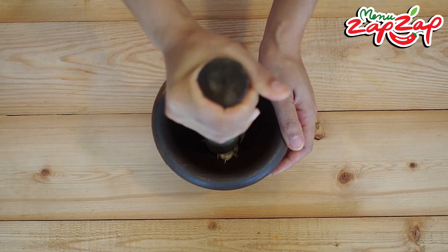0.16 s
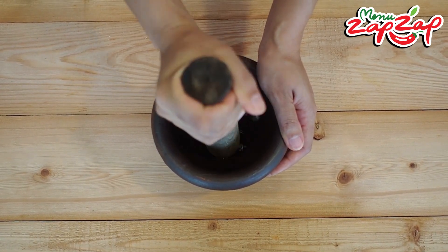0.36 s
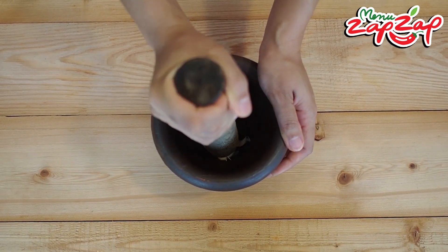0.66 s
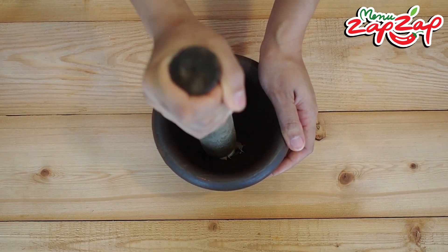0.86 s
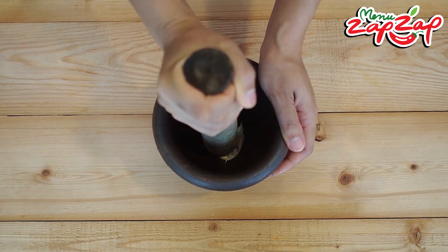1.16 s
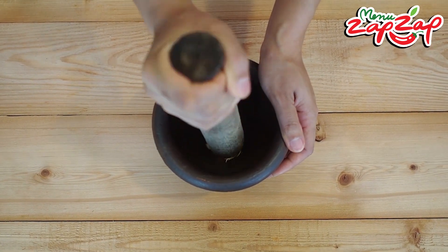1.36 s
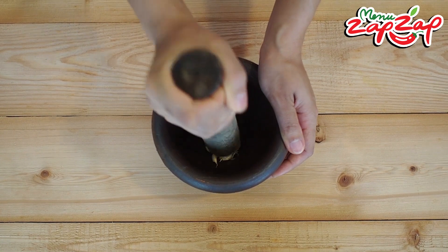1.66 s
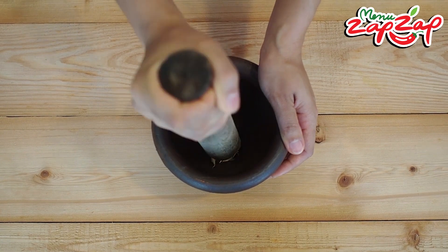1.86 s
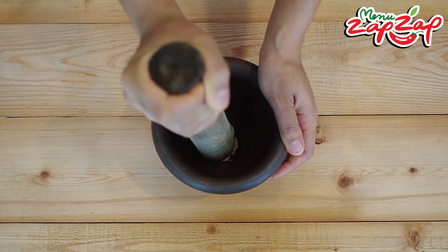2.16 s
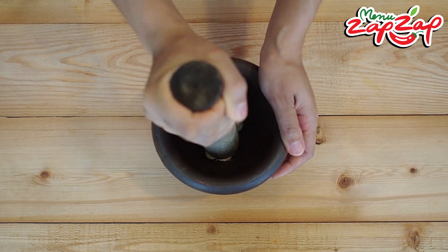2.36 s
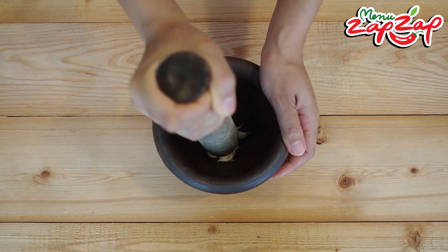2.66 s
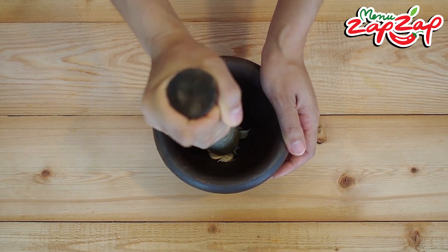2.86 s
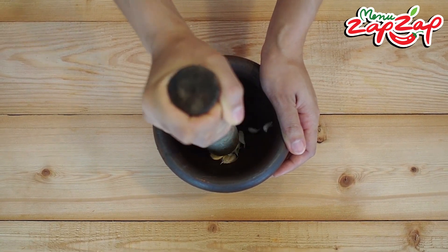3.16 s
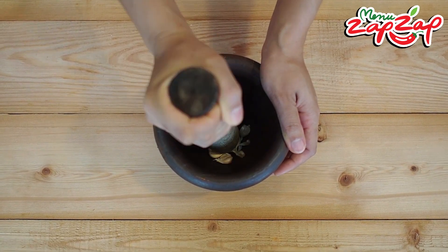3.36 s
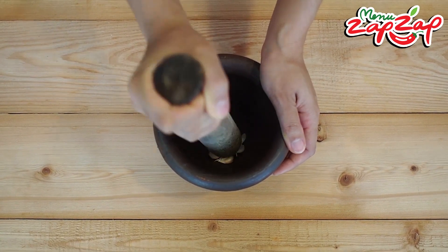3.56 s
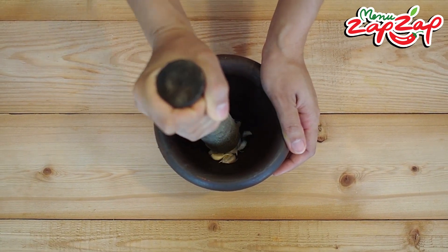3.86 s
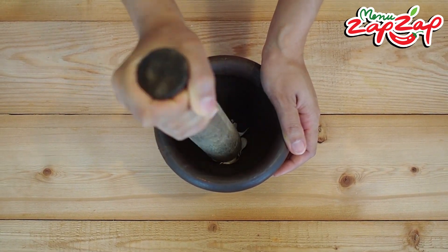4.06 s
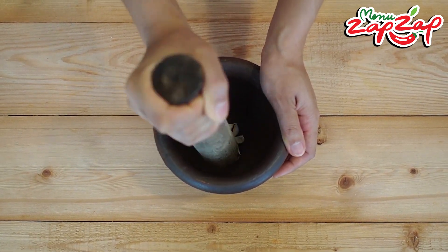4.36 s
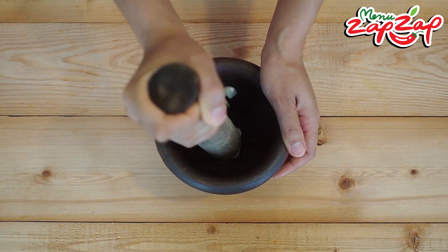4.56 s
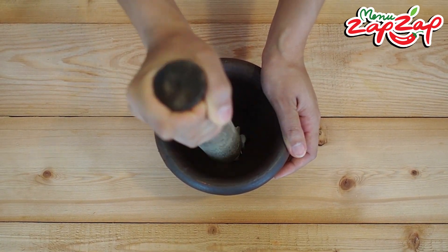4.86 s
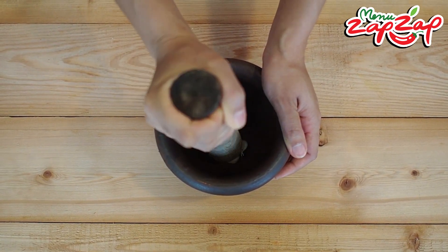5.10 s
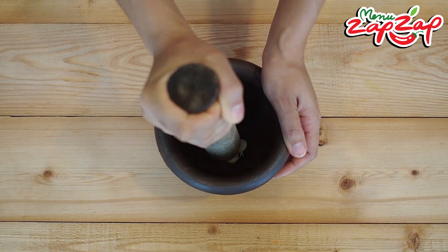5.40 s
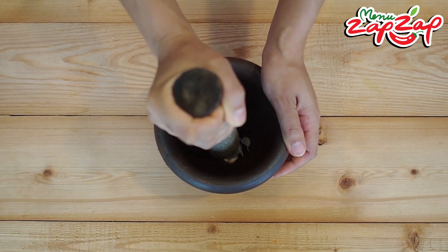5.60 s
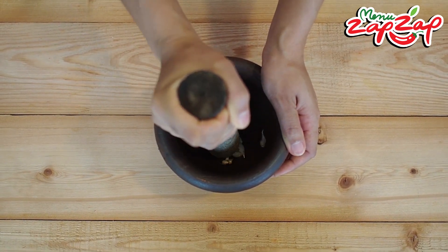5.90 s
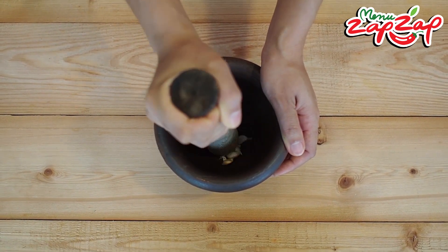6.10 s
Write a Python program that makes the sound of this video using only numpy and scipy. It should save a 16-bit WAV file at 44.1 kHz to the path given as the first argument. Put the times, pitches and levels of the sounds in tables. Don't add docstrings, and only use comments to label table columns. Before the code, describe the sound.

In a reverberant kitchen, a pestle pounds garlic in a mortar on a plank table, miked closely in stereo. The tail of an earlier blow is dying at 0 s; the first new hit lands at 0.13 s, and others follow every 0.27-0.3 s until 6.2 s, twenty-three in all. Each starts with a bright, wet crunch a few milliseconds before a hard, clattering bowl knock, with hollow bowl resonance and a low wooden table thump, then about half a second of room decay. Blows near 1.25, 1.5 and especially 1.77 s are strong, with a thin metallic ring from a nearby utensil. At 0.7 s a sharp sticky snap stands out. Around 3.9-4.5 s the hits soften, the one at 4.5 s mostly a slow squash with a weak knock; firmer pounding resumes at 4.8 s. Skins rustle, pulp ticks and crumbs patter faintly between blows over soft hiss.

```python
import sys
import numpy as np
from scipy import signal
from scipy.fft import rfft, irfft
from scipy.io import wavfile
from scipy.ndimage import uniform_filter1d

SR = 44100
rng = np.random.default_rng(int(sys.argv[2]) if len(sys.argv) > 2 else 0)


def gain_from_db(level_db):
    decades = np.asarray(level_db, float) / 20
    return 10 ** decades


def int16_out(signal):
    q = np.round(np.clip(np.atleast_2d(signal).T, -1, 1) * 32767)
    wavfile.write(sys.argv[1], SR, q.astype(np.int16))


N = 275184
PAD = SR // 4
USUAL_DB = -21

# f/Hz, level/dB per Hz
SQUELCH = [(880, -32), (1500, -13.5), (2450, -17), (3590, -2), (4800, -6), (7250, -0.5), (12200, -6.5),
           (13900, 0), (15900, -9), (16500, -16)]
# f/Hz, level/dB per Hz
SKINS = [(2500, -19), (4500, -6.5), (6500, -8), (8000, 2.5), (10500, -3), (12000, 0), (13500, 2),
         (16000, -6)]


def read(points, hz):
    f, value = np.transpose(points)
    return np.interp(np.log(hz + 1), np.log(f + 1), value)


def evened(x):
    return x / np.sqrt(np.mean(x ** 2) + 1e-20)


def add(mix, s, sound):
    part = mix[PAD + round(s * SR):][:len(sound)]
    part += sound[:len(part)]


def shaped(x, gain):
    size = x.shape[-1]
    return irfft(rfft(x) * gain(np.fft.rfftfreq(size, 1 / SR)), size)


def causal(db, size=2048):
    log_gain = np.log(gain_from_db(np.r_[db, db[-2:0:-1]]))
    return np.fft.ifft(np.exp(np.conj(signal.hilbert(log_gain)))).real[:size]


def mode(t, hz, db, t60, rise_ms):
    swell = 1 - np.exp(-t * 1e3 / rise_ms)
    return gain_from_db(db - 60 * t / t60) * swell * np.sin(2 * np.pi * hz * t)


def pulp_db(hz, spray_db, body):
    return read(body, hz) + spray_db * np.clip((hz - 10500) / 2200, 0, 1)


def fizz(colour, grain_db, size=4096):
    white, clumps = rng.standard_normal((2, size))
    clumps = gain_from_db(grain_db * evened(uniform_filter1d(clumps, size=24)))
    return evened(shaped(white * clumps, lambda hz: gain_from_db(colour(hz))))


def likeness(hz):
    # f/Hz, left-right correlation/1
    same = [(100, 0.89), (640, 0.94), (1400, 0.65), (3100, 0.036), (7000, 0.052), (15000, 0.055)]
    return np.clip(read(same, hz), 0, 1)


def hush():
    # f/Hz, level/dB per Hz
    air = [(30, -3), (130, -4), (400, -16.5), (1500, -27), (6000, -33), (11000, -41.5), (13700, -35),
           (16000, -36)]
    a, b = rng.standard_normal((2, N))
    right = shaped(a, likeness) + shaped(b, lambda hz: np.sqrt(1 - likeness(hz) ** 2))
    return gain_from_db(-48.5) * evened(shaped(np.array([a, right]), lambda hz: gain_from_db(read(air, hz))))


def crumbs():
    size = N + PAD
    ticks = rng.random(size) < 70 / SR
    sizes = gain_from_db(4.5 * np.minimum(rng.exponential(1, size), 4)) * ticks
    decay = np.exp(-np.arange(200) / 34.0)
    burst = np.convolve(sizes, decay)[:size] * rng.standard_normal(size)
    return gain_from_db(-54) * shaped(burst, lambda hz: gain_from_db(pulp_db(hz, 3.2, SKINS)))


def rustle(s, half_ms, db):
    ms = (np.arange(8192) - 4096) / SR * 1e3
    clusters = gain_from_db(5.7 * evened(uniform_filter1d(rng.standard_normal(len(ms)), size=90)))
    swell = np.exp(-(ms / max(half_ms, 2)) ** 2)
    crackle = fizz(lambda hz: pulp_db(hz, 2, SKINS), grain_db=-3.5, size=8192)
    return s - 4096 / SR, gain_from_db(db) * swell * clusters * crackle


def crush(s, rise_ms, length_ms, db, spray_db):
    end_ms = max(length_ms, rise_ms + 0.28)
    ms = np.arange(4096) / SR * 1e3 - 3
    at_ms = [-3, -.4, 0, 0.73 * rise_ms, rise_ms, rise_ms + 1.16, end_ms + 0.43, end_ms + 5, end_ms + 70]
    level_db = np.interp(ms, at_ms, [-50, -64, -9.5, -1.0, 4.0, -1.0, -8.0, -14, -91])
    wet = fizz(lambda hz: pulp_db(hz, spray_db + 4, SQUELCH), grain_db=3.8)
    return s - .003, gain_from_db(db - 2.5 + level_db) * wet * signal.windows.tukey(len(ms), .02)


def snap(s, rise_ms, length_ms, db, spray_db):
    hz = np.fft.rfftfreq(4096, 1 / SR)
    click = causal(pulp_db(hz, 0.79 * (spray_db + 3.5), SQUELCH))
    return s + rise_ms / 1e3, gain_from_db(db + 19.5) * click / np.linalg.norm(click)


def knock(db):
    # f/Hz, width/Hz, level over the clatter/dB
    bowl = [(544, 47, 4), (788, 53, 5.5), (1033, 73, 5), (1264, 20, -2), (1527, 130, 4), (1850, 56, 2.5),
            (2140, 52, 3.5), (2820, 86, 5), (3327, 125, 5.5), (4050, 78, 5.5)]
    # f/Hz, level/dB per Hz
    clatter = [(150, -22.5), (300, -7), (620, -11), (900, -6.5), (1500, -4.5), (2200, -9), (2600, -13.5),
               (4000, -15), (5000, -18.5), (7000, -31.5), (12000, -74)]
    hz = np.fft.rfftfreq(4096, 1 / SR)
    spot = rng.standard_normal(len(bowl))
    bumps = 0
    for (f, width, mode_db), k in zip(bowl, spot):
        bumps = bumps + (mode_db + 1.05 * k) / (1 + (2 * (hz - f) / width) ** 2)
    click = causal(read(clatter, hz) + bumps)
    click /= np.linalg.norm(click)
    ms = np.arange(2600) / SR * 1e3
    contacts = (rng.random((2, len(ms))) < .15) * rng.standard_normal((2, len(ms)))
    contacts = evened(contacts) * gain_from_db(np.interp(ms, [0, 4, 22, 59], [1.5, 1.5, -11.0, -20]))
    shared, apart = signal.fftconvolve(contacts, click[None], axes=1)
    apart = .5 * shaped(apart, lambda f: np.clip(f / 2200, 0, 1))
    return gain_from_db(db + 3.0) * np.array([shared + apart, shared - apart]), gain_from_db(db + 29) * click


def table_levels(db, low_db, high_db, hollow_db):
    low_boards = (-2.5, 4.5)
    high_boards = (2, -4.5)
    legs_db = -29 + 0.28 * (db - USUAL_DB)
    parts = [legs_db, low_db + 0.4, hollow_db]
    planks = [low_db + k for k in low_boards] + [high_db + k for k in high_boards]
    planks[0] += 0.17 * (USUAL_DB - db)
    return np.subtract(parts, db), np.subtract(planks, db)


def shaken(db, parts_db, planks_db):
    # f/Hz, level/dB, t60/s, rise/ms
    rings = [
        [(48.6, -8, 0.39, 7.9), (53.9, 3.5, 0.46, 7.7), (63.2, 5, 0.17, 6.4), (77.4, -1.5, 0.29, 6.6)],
        [(133.3, 4, 0.17, 5.3), (175.6, -10, 0.29, 0.53)],
        [(249.7, -17, 0.35, 1), (297, -5, 0.34, 0.85), (320.6, 9, 0.11, 4.1), (318.5, -10, 0.62, 3.7)],
    ]
    # f/Hz, level/dB, t60/s, rise/ms
    planks = [(113.5, -4, 0.45, 6.7), (140, -6.5, 0.67, 2.6), (167.26, -0.5, 0.31, 2.8),
              (191.7, -5.5, 0.56, 12)]
    # f/Hz, level/dB, t60/s, rise/ms
    wall_modes = [(854, -17.5, 0.48, 7.7), (952, -18.5, 0.72, 32), (1103, -6, 0.15, 3.4),
                  (1240, -5, 0.17, 6.5), (1497, -23, 0.27, 4.5), (1491, -20, 0.64, 1.7),
                  (1788, 2.5, 0.06, 0.44), (2216, -20.5, 0.27, 3.1)]
    grip_detune = .022
    t = np.arange(SR * 3 // 5) / SR
    landed = np.maximum(t - .004, 0)
    boards = sum(gain_from_db(k) * mode(t, *m) for m, k in zip(planks, planks_db))
    wall = 0
    for (hz, *m), k in zip(wall_modes, rng.standard_normal(len(wall_modes))):
        wall = wall + gain_from_db(2.5 * k) * mode(landed, hz * (1 + grip_detune * k), *m)
    rest = 0
    for part, k in zip(rings, parts_db):
        for m in part:
            rest = rest + gain_from_db(k + rng.standard_normal()) * mode(t, *m)
    return -gain_from_db(db + 2.5) * (boards + wall + rest)


def utensil(s, db, ring_db):
    # f/Hz, onset level over the mean/dB, t60/s, rise/ms, right-port share/1
    metal = [(3413, 16, .62, 12, 0), (3375, 15, .5, 8, -.6), (5787, 20, .38, 8, .1), (5851, 18, .6, 14, .4),
             (3235, 7, .45, 8, -.3)]
    # level at a usual ring/dB, slope/dB per dB of ring
    ring_law = [(-45.5, .8), (-44, 1.1)]
    # level at a usual knock/dB, slope/dB per dB of knock
    shrill_law = [(-62, 2.7), (-63.5, 3.0)]
    usual_ring_db = -48
    modes_db = [usual + slope * (ring_db - usual_ring_db) for usual, slope in ring_law]
    modes_db += [usual + slope * (db - USUAL_DB) for usual, slope in shrill_law]
    modes_db.append(modes_db[1])
    t = np.arange(SR * 3 // 5) / SR
    wobble = rng.standard_normal((len(metal), len(t)))
    wobble = uniform_filter1d(uniform_filter1d(wobble, size=500), size=500)
    wobble_db = 2.5 * evened(wobble) - .5
    ringing = 0
    for m, level_db, w in zip(metal, modes_db, wobble_db):
        ringing = ringing + np.outer(gain_from_db(level_db + w) * mode(t, *m[:4]), [1, m[4]])
    return s, ringing


def peel(s, db, length_ms):
    ms = np.arange(4096) / SR * 1e3
    shape = gain_from_db(db - 2.0 - 20 * ms / max(length_ms, 1)) * (1 - np.exp(-ms / 0.27))
    return s, shape * fizz(lambda hz: pulp_db(hz, -1, SKINS), grain_db=7.0)


def kitchen(mixes):
    # f/Hz, t60/s
    decay = [(100, 0.55), (300, 0.47), (750, 0.52), (1900, 0.56), (5000, 0.54), (13500, 0.38)]
    # f/Hz, level of room against direct/dB
    wet = [(200, 5.5), (1000, 3), (2500, 1), (6000, -8.5), (14000, -8.5)]
    taps = np.zeros((len(mixes) + 1, 2, SR * 3 // 5))
    jitter = rng.integers(0, 12, (len(taps), 2, (taps.shape[2] - 131) // 12))
    at = np.arange(130, taps.shape[2] - 12, 12) + jitter
    np.put_along_axis(taps, at, rng.choice([-1., 1.], at.shape), 2)
    hz, t, z = signal.stft(taps[:-1] + 1.6 * taps[-1], SR, nperseg=256)
    same = likeness(hz)[:, None]
    z[:, 1] = same * z[:, 0] + np.sqrt(1 - same ** 2) * z[:, 1]
    t60 = read(decay, hz)[:, None]
    tails = signal.istft(z * gain_from_db(-60 * t / t60) / np.sqrt(t60), SR, nperseg=256)[1]
    tails[..., :130] = 0
    tails = shaped(tails / np.linalg.norm(tails[0, 0]), lambda f: gain_from_db(read(wet, f)))
    return signal.fftconvolve(mixes[:, None], tails, axes=2)[..., :mixes.shape[1]].sum(0)


def scene():
    # t/s, rise/ms, peak level/dB, fine spray above the squelch/dB
    crushes = [(0.1213, 1.3, -9.5, -5.5), (0.418, 0.71, -9, -5.5), (0.6933, 6.5, -11, 3),
               (0.9623, 11.1, -11.5, 0.5), (1.2336, 5.6, -9.5, -4), (1.499, 1.5, -7.5, -6),
               (1.7646, 1.3, -7.5, -12), (2.0458, 3, -8.5, -5.5), (2.3148, 4.8, -9, -7),
               (2.576, 3.2, -11, -5), (2.8523, 3, -11.5, -4), (3.1181, 7.5, -11.5, -2.5),
               (3.397, 0.9, -10, -10), (3.671, 2.37, -9.5, -9), (3.936, 4.2, -12.5, -1),
               (4.208, 14, -14, -2.5), (4.48, 23.7, -15, -1.5), (4.7721, 4.8, -10, -2),
               (5.066, 2.8, -11, -7), (5.3523, 4.2, -11.5, 0.5), (5.6306, 6.1, -13, -3.5),
               (5.9153, 7.5, -12.5, -0.5), (6.1874, 1.7, -9.5, -2.5)]
    # t/s, knock/dB, low boards/dB, high boards/dB, utensil/dB
    knocks = [(0.128, -19.5, -25, -40, -50), (0.429, -22, -17.5, -22.5, -45), (0.7015, -25, -26, -34, -64),
              (0.971, -26.5, -25, -22.5, -59), (1.2433, -18.5, -24.5, -23, -43),
              (1.5059, -19.5, -24, -21.5, -43.5), (1.7697, -16, -19.5, -23.5, -40),
              (2.053, -23.5, -30, -29, -56), (2.322, -19.5, -24.5, -31, -48.5),
              (2.583, -19.5, -23.5, -23.5, -49.5), (2.8592, -17.5, -20.5, -27, -44.5),
              (3.1271, -23.5, -22.5, -19, -60), (3.4073, -18.5, -22, -26, -48.5),
              (3.68, -22.5, -30, -20, -63), (3.9455, -25, -27.5, -19.5, -64),
              (4.222, -24.5, -22.5, -24, -53), (4.4966, -36, -24, -57, -74),
              (4.7817, -22.5, -27, -33, -43.5), (5.0723, -21, -33, -26, -55),
              (5.3619, -22.5, -32, -34.5, -55), (5.6393, -21, -27, -21.5, -54),
              (5.9241, -20, -22, -19.5, -53), (6.195, -24.5, -23.5, -17.5, -52)]
    earlier = [
        (1.4, -4, 0),
        (-15, -18, -14, -46),
    ]
    hollow = [-27, -26, -34, -31.5, -42.5, -26, -29, -33, -28, -30, -27, -26.5, -30.5, -27.5, -27.5, -33.5,
              -39, -39.5, -29, -30, -31.5, -27.5, -28, -30]
    # t/s, peak
    # level/dB, length/ms
    peels = [(0.2284, -28, 7.4), (0.245, -30, 6.8), (0.276, -28.5, 12), (0.4255, -12, 3), (0.6305, -25, 6),
             (0.7077, -1.5, 3.3), (1.1183, -23, 5.2), (1.1368, -32, 10), (1.1547, -16, 5.7),
             (1.1874, -31, 11), (1.982, -27, 3.9), (2.058, -12, 3), (2.449, -31, 6), (2.476, -31, 7.8),
             (2.5094, -32, 5.4), (3.3477, -33, 8.2), (4.024, -21.5, 4), (4.2986, -33, 6), (4.3164, -32, 6),
             (4.3327, -27.5, 6), (4.3794, -34.5, 8.9), (4.4414, -39, 8), (4.6264, -31, 5),
             (4.6927, -33, 3.8), (4.7507, -36, 3.7), (4.766, -24, 3), (4.8816, -25, 3.8), (5.0994, -22, 6),
             (5.3694, -17, 6), (6.1643, -32, 2.7)]
    # centre t/s, half width/ms, level/dB
    rustles = [(.072, 21, -43), (.25, 20, -52), (.412, 5.4, -44), (.65, 36, -45), (1.165, 37, -44),
               (1.99, 8.5, -52), (2.25, 48, -47.5), (2.49, 23, -48.5), (2.749, 27, -50), (3.352, 42, -50),
               (4.13, 22, -56), (4.67, 71, -50), (5.149, 26, -57), (6.125, 21, -52)]
    squash_share = 0.64
    near, far, wide = crumbs(), np.zeros((4, N + PAD)), np.zeros((N + PAD, 2))
    first = [(-.16, *row) for row in earlier]
    for k, (pulp_row, knock_row) in enumerate([first, *zip(crushes, knocks)]):
        touch_s, rise_ms, *pulp = pulp_row
        s, db, low_db, high_db, ring_db = knock_row
        squash = touch_s, rise_ms, squash_share * (s - touch_s) * 1e3, *pulp
        chatter, click = knock(db)
        add(near, *crush(*squash))
        add(far[k % 4], *snap(*squash))
        add(wide, s, chatter.T)
        add(far[k % 4], s, click)
        add(near, s - .003, shaken(db, *table_levels(db, low_db, high_db, hollow[k])))
        add(wide, *utensil(s, db, ring_db))
    for s, crackle in [peel(*row) for row in peels] + [rustle(*row) for row in rustles]:
        add(near, s, crackle)
        add(far[0], s, crackle)
    return (near + wide.T + kitchen(far))[:, PAD:] + hush()


def roll_off(x):
    return signal.sosfilt(signal.butter(12, 16790, fs=SR, output="sos"), x)


def record(dry):
    # f/Hz, left minus right level/dB
    port_db = [(60, 0.72), (2400, -1), (4400, -2.1), (8000, 3.5), (10000, 1), (12000, -6.5), (13500, -12),
               (16000, -11)]
    # f/Hz, phase lag between ports/rad
    port_lag = [(300, 0.0086), (3000, 0.43), (6500, 0.61), (9000, 1.42), (12500, 1.87), (14000, 2.4),
                (15500, 1.1)]
    side = np.array([[.5], [-.5]])
    ports = shaped(dry, lambda hz: gain_from_db(side * read(port_db, hz)) * np.exp(-1j * side * read(port_lag, hz)))
    ports = signal.sosfilt(signal.butter(5, 44, "high", fs=SR, output="sos"), ports)
    ports = shaped(ports, lambda hz: gain_from_db(np.interp(hz, [15700, 16000, 16800], [0, -14, -38])))
    mix = np.clip(ports - .0042, -1, 1)
    return roll_off(mix)


dry = scene()
out = record(dry)
int16_out(out)
```